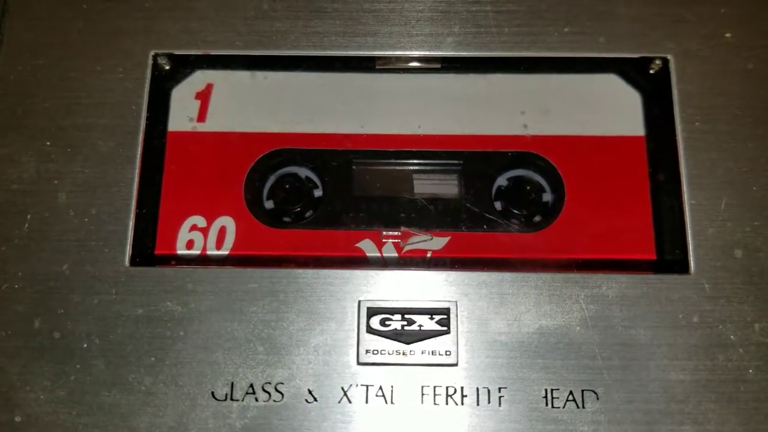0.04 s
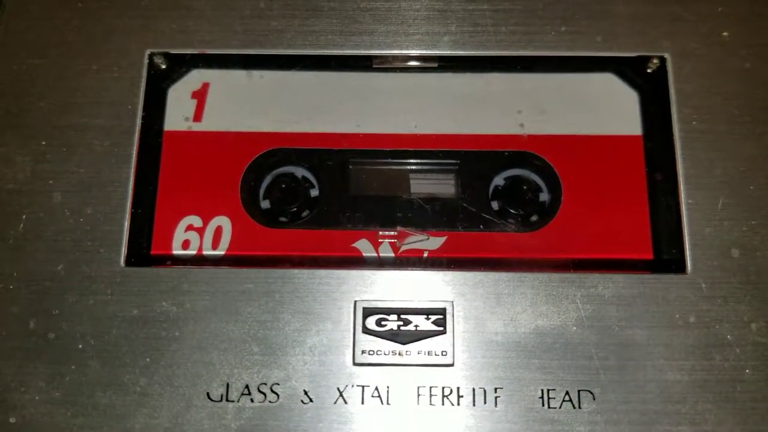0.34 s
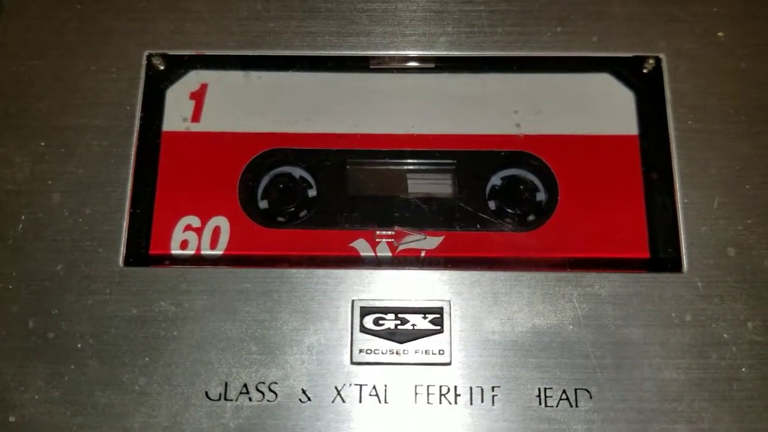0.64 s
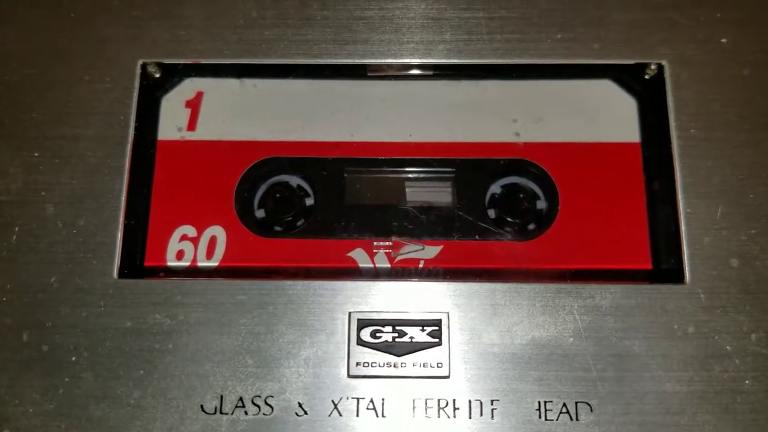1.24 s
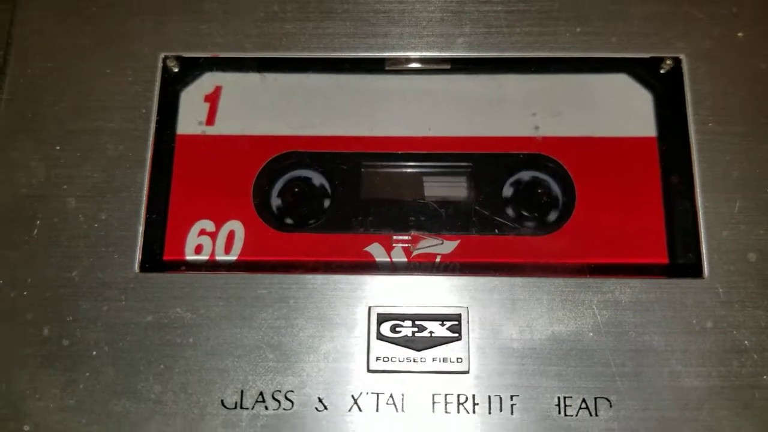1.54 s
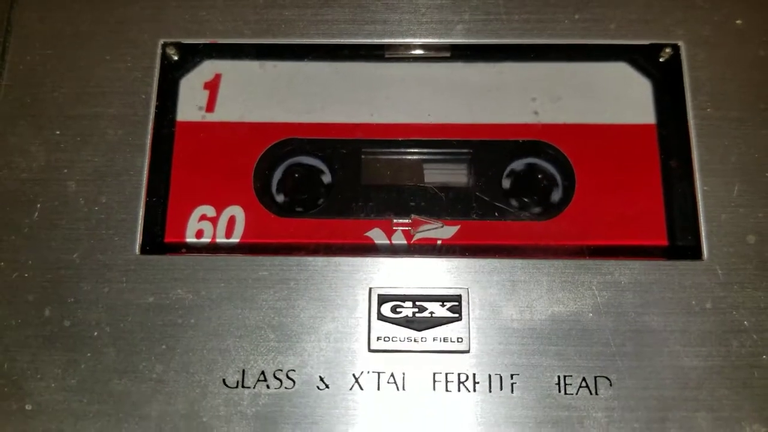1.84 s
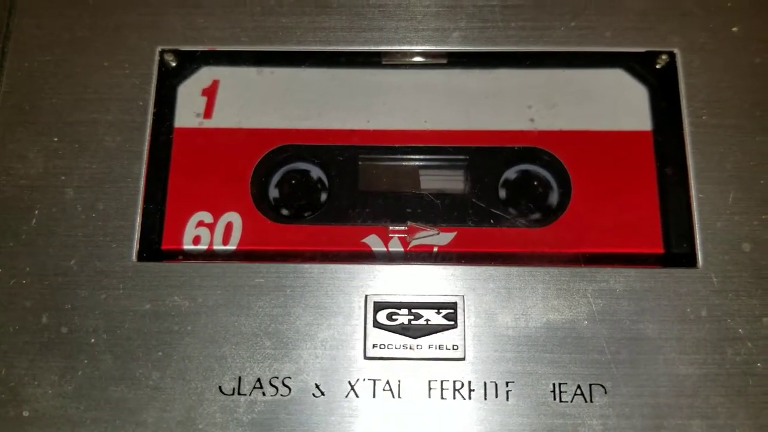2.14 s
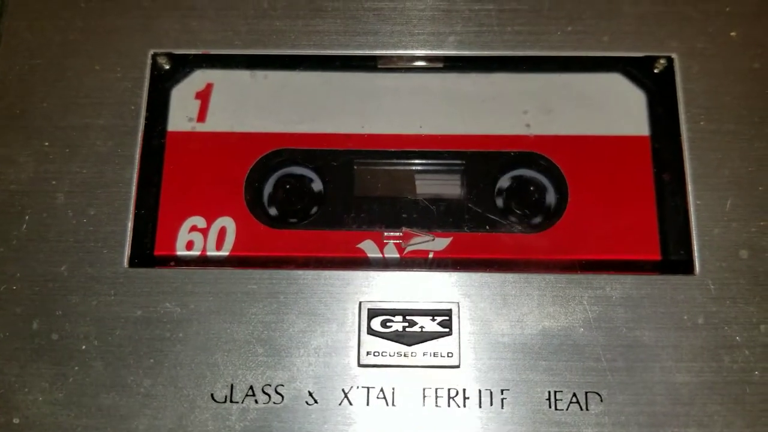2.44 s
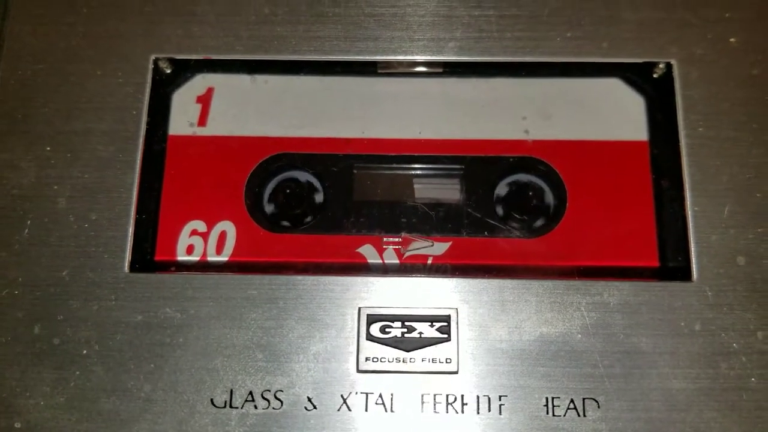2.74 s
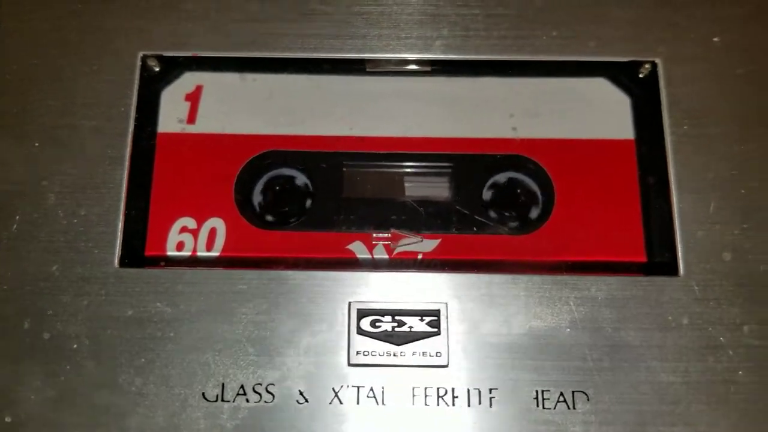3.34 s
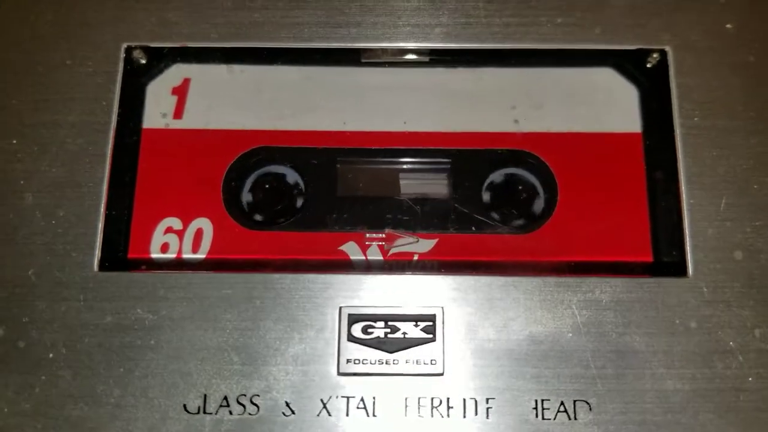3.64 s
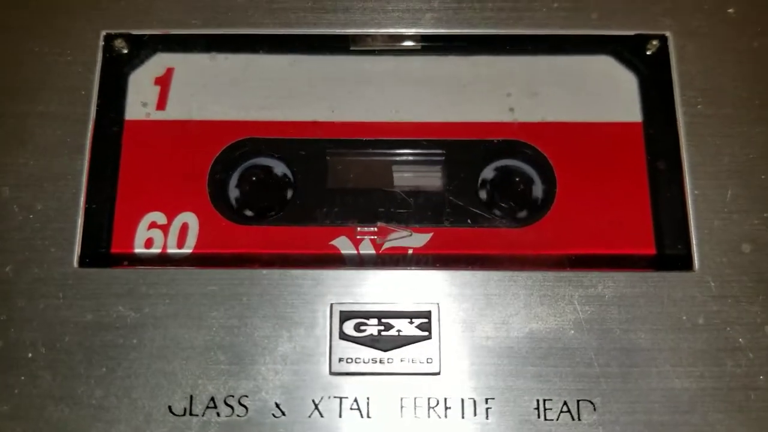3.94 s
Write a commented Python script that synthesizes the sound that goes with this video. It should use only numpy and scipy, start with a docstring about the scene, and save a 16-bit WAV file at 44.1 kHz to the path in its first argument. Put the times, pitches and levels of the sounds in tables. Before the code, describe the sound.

Cassette deck engages with a clunk, then runs with a loud, screeching mechanical buzz.

```python
"""A cassette deck idles with a quiet motor hum. At 1.33 s its transport engages: levers hit their stops
in a double clunk and the chassis rings. From 1.42 s a slipping drive part chatters about 170 times a
second, fluttering with an uneven wheel. Each cycle jolts the chassis into a loud buzz and drags out a
few gritty scrapes that screech in the metal parts. The chatter grows louder. Two microphones, close by."""
import sys
import numpy as np
from scipy import signal
from scipy.fft import rfft, irfft, next_fast_len
from scipy.io import wavfile

SR = 44100
rng = np.random.default_rng(int(sys.argv[2]) if len(sys.argv) > 2 else 0)


def transcribe(u):
    """Save the signal u as a 16-bit wav file named by the first command-line argument.

    u: samples, shape (n,) or (channels, n), limited to [-1, 1]; the rate is SR.
    q: integer samples, one column per channel.
    """
    v = np.clip(np.atleast_2d(u).T, -1, 1)
    q = np.round(v * 32767).astype(np.int16)
    wavfile.write(sys.argv[1], SR, q)


N = 176400
T = np.arange(N) / SR
FFT_SIZE = next_fast_len(N + SR // 2)
BIN_HZ = np.maximum(np.fft.rfftfreq(FFT_SIZE, 1 / SR), 1)

# chatter rate (time [s], rate [Hz])
CHATTER_RATE = [(1.42, 169.9), (2.25, 169.9), (2.42, 171.1), (2.6, 171), (2.8, 171.1), (3.05, 170.1),
                (3.2, 170.4), (3.5, 171.0), (3.68, 170.4), (3.82, 171.1), (4.0, 171)]
# chatter levels (time [s], low partials [dB], upper partials [dB], rasp [dB], sizzle [dB])
CHATTER_LEVELS = [(1.43, -4.5, -2.5, -5.5, -4.5), (1.5, -8.5, -7.5, -2, -4), (1.62, -7.5, -4, -3, -3),
                  (1.78, -3, -2, -4, -3.5), (2.03, -2.5, -2.5, -4, -2.5), (2.38, -3, -4, -3.5, -3.5),
                  (2.6, -1, -1.5, -1, -1), (3.0, 0, 1.5, 0, -1), (3.27, -.5, 0.5, 0, -.5),
                  (3.57, 0.5, -0.5, 1, 0), (4.0, .5, 0, 1, 0.5)]
# rate sway, once and twice per wheel turn (depth [Hz], delay [s])
WHEEL_FLUTTER = [(0.53, .03), (.48, .011)]
# rasp swing from uneven wheel pressure (time [s], depth [dB])
WHEEL_WOBBLE = [(1.7, -0.5), (2.02, 4.5), (2.45, 2.5), (2.75, 2)]
# partials 1, 2, 3 .. of the chatter rate (left [dB], right [dB], left lead [rad])
BUZZ_PARTIALS = [(-41, -34, 0.27), (-55, -58, -1.5), (-31, -33, -1.5), (-59, -41, -3),
                 (-33.5, -35.5, -0.04), (-47.5, -38.5, 1.5), (-43.5, -50, 2.5), (-45.5, -31, 2),
                 (-46, -44.5, 1), (-43, -31, 3), (-45.5, -39.5, -2), (-55, -41.5, 2.5), (-46, -43, 2.1),
                 (-52, -47, -0.5), (-41, -32.5, 2.03), (-44.5, -44.5, 1.7), (-49, -42.5, 2.5),
                 (-54, -40, 3), (-53.5, -46, 1), (-49, -41, 0.5), (-50.5, -44.5, -0.9), (-56, -54, 7.5),
                 (-62, -42.5, -1.5), (-63, -44, -2)]
# scrapes in one cycle (place [cycles], rasp [dB], sizzle [dB])
CYCLE_SCRAPES = [(0.128, -4, -2), (.32, -7, -2.5), (0.411, -0.5, -0.5), (0.581, 3, -11), (.78, 2.5, -9.5),
                 (.95, 1, -5.5)]
# resonances of the metal parts (frequency [Hz], width [Hz], gain [dB])
METAL_MODES = [(420, 22, -2.5), (966, 55, 1), (1570, 25, -4), (2095, 42, -3), (2390, 40, -8.5),
               (2570, 44, -13), (2960, 18, 4), (3080, 60, -6.5), (3440, 39, -2.5), (3586, 31, 3),
               (3940, 45, -3), (4490, 76, -1), (4790, 88, 0), (5510, 200, -5.5), (6600, 230, -1),
               (7380, 360, -4.5), (9900, 300, -11), (11920, 380, -5), (13450, 350, -12), (14950, 300, -4)]
# scrape colour (frequency [Hz], left [dB], right [dB])
SCRAPE_EQ = [(40.3, -62, -55), (75, -50, -50), (130, -35, -36), (255, -36.5, -34), (450, -25, -24.5),
             (580, -23, -29), (750, -35, -24.5), (945, -25, -20.5), (1145, -35.5, -24),
             (1580, -23.5, -15.5), (2120, -33, -19.5), (2470, -17.5, -20), (2880, -26, -21),
             (3590, -23.5, -17.5), (4010, -32.5, -23), (4300, -30, -27), (4770, -34, -24.5),
             (5300, -34.5, -30.5), (5900, -37.5, -24.5), (6950, -35, -28), (7400, -45, -28),
             (8100, -32.5, -29), (11350, -36, -28), (12100, -39, -23.5), (15500, -39.5, -31)]
# lever impacts (time [s], thud [dB], clack [dB], crack [dB])
LEVER_BLOWS = [(1.329, -42, -23, -17), (1.335, -20, -16, -36), (1.3422, -12.5, -2.5, 0.5),
               (1.345, -8, -2, 4.5), (1.3622, -2, -2, 9), (1.3654, 2, 0.5, -6), (1.3755, 1, -10, -18),
               (1.3814, -10.5, -9.5, -22), (1.396, -24, -28, -33)]
# clunk colour (frequency [Hz], left [dB], right [dB])
CLUNK_EQ = [(40, -49, -47), (75, -39, -37), (130, -23, -23), (250, -18, -14.5), (465, -3.5, -2.5),
            (696, -21.5, -19.5), (905, -11, -14), (1380, -23, -6.5), (1730, -21, -6), (2480, -16, -11.5),
            (3700, -28, -12), (4770, -27, -20.5), (9100, -27, -26), (10400, -24, -17.5), (15000, -26, -24)]
# chassis ringing (frequency [Hz], level [dB], T60 [s])
CHASSIS_MODES = [(111, -40.5, .3), (396, -26.5, 0.058), (496.5, -24.5, 0.073), (562, -32, .06),
                 (828, -26, 0.044), (1160, -40, .05), (1420, -34, 0.045), (1670, -32, .04),
                 (1830, -33, .05), (1980, -33, .05)]
# idle hum (frequency [Hz], left [dB], right [dB], waver [dB])
MOTOR_TONES = [(119.9, -59.5, -54.5, 2), (213, -67.5, -70, -1.5), (271.4, -55.5, -57.5, 2),
               (359.5, -67.5, -66, 3), (495.4, -58, -54, 1.8), (670, -78, -82, 5), (730, -67.5, -76, 3.5),
               (2570, -83, -76, 0.5), (2708, -88, -81, 2)]
# colour of motor whirr and hiss (frequency [Hz], left [dB], right [dB])
WHIRR_EQ = [(30, -54, -53), (75, -38.5, -42.5), (160, -50, -41), (226, -28.5, -34), (365, -49, -43),
            (620, -43, -39), (964, -49, -45), (1220, -65, -59), (1880, -59, -46.5), (2320, -60, -52),
            (2560, -61, -48.5), (2960, -71, -51.5), (3920, -72, -54), (5170, -75, -67), (6300, -74, -61),
            (8500, -76, -75), (13000, -72.5, -70)]
# likeness of the two microphones (frequency [Hz], correlation [-1 to 1])
MIC_CORRELATION = [(60, 0.72), (130, 0.96), (330, 1), (700, 0.19), (1400, -0.4), (3100, -0.14),
                   (7000, 0.037)]


def slipping_drive(start_s=1.418, rise_s=0.012, wander_hz=0.12, jitter_hz=1.0):
    """A drive part slips; buzz and scraping share its fluttering chatter rate."""
    flutter_hz = sum(depth_hz * wheel(multiple, delay_s)
                     for multiple, (depth_hz, delay_s) in enumerate(WHEEL_FLUTTER, 1))
    rate_hz = over_time(CHATTER_RATE)[0] + flutter_hz + wander_hz * drift(15) + jitter_hz * drift(150)
    cycles = np.cumsum(rate_hz) / SR
    low_db, upper_db, rasp_db, sizzle_db = over_time(CHATTER_LEVELS)
    onset = np.clip((T - start_s) / rise_s, 0, 1)
    return onset * (buzz(cycles, low_db, upper_db) + scraping(cycles, rasp_db, sizzle_db))


def wheel(multiple, delay_s, turn_hz=12.8, peak_s=2.023):
    """Swing of the uneven wheel at a multiple of its turning rate."""
    return np.cos(2 * np.pi * multiple * turn_hz * (T - peak_s - delay_s))


def buzz(cycles, low_db, upper_db, jolt_at_cycles=0.7, smear_rad=1.44):
    """The chassis answers one jolt per cycle with phase-scattered partials, the higher less steady."""
    partials = np.zeros((2, N))
    for multiple, (left_db, right_db, lead_rad) in enumerate(BUZZ_PARTIALS, 1):
        phase_rad = 2 * np.pi * multiple * (cycles - jolt_at_cycles) + smear_rad * rng.standard_normal()
        force_db = low_db if multiple <= 5 else upper_db
        waver_db = 1.13 * (multiple / 5) ** 0.36 * drift(23)
        gain = from_db(force_db + waver_db) * from_db([[left_db], [right_db]])
        partials += gain * np.sin([phase_rad + lead_rad, phase_rad])
    return np.sqrt(2) * from_db(0.22) * partials


def scraping(cycles, rasp_force_db, sizzle_force_db, scatter_s=0.00018, split_hz=4480):
    """Each cycle drags out gritty scrapes, low rasp plus high sizzle, which ring in the metal."""
    place, rasp_db, sizzle_db = np.transpose(CYCLE_SCRAPES)
    due_cycles = np.arange(int(cycles[-1]) - 1)[:, None] + place
    times_s = np.interp(due_cycles, cycles, T, right=2 * T[-1])
    times_s += scatter_s * rng.standard_normal(times_s.shape)
    excess_db = 3 * rng.uniform(-1, 1, times_s.shape)
    # a strong scrape is weaker one cycle later
    excess_db = excess_db - 0.8 * np.roll(excess_db, 1, axis=0)

    def grit(level_db, decay_s):
        envelope = bursts(times_s.ravel(), (level_db + excess_db).ravel(), decay_s)
        return unit_rms(stereo_noise() * envelope * from_db(-0.5 * drift(3100)))

    rasp = butter(grit(rasp_db, decay_s=0.0011), split_hz, "low")
    sizzle = butter(grit(sizzle_db, decay_s=0.0025), split_hz, "high")
    wobble_db = over_time(WHEEL_WOBBLE)[0] * wheel(0.99, 0)
    rub = from_db(rasp_force_db + wobble_db) * rasp + from_db(sizzle_force_db) * sizzle
    screech = sum(from_db(db) * resonance(rub, hz, width_hz) for hz, width_hz, db in METAL_MODES)
    grip_db = -0.5 + 0.3 * drift(70)
    return from_db(grip_db) * equalise(rub + screech, SCRAPE_EQ)


def transport_clunk(thud_hz=800, crack_hz=4200):
    """Levers hit their stops: a crack, a clack and a longer thud; the chassis rings."""
    times_s, thud_db, clack_db, crack_db = np.transpose(LEVER_BLOWS)

    def band(level_db, edge_hz, kind, t60_s):
        return butter(stereo_noise() * bursts(times_s, level_db, t60_s / np.log(1000)), edge_hz, kind)

    thud = band(thud_db, thud_hz, "low", t60_s=0.052)
    clack = band(clack_db, [thud_hz, crack_hz], "band", t60_s=0.044)
    crack = band(crack_db, crack_hz, "high", t60_s=0.031)
    modes = sum(from_db(db - 60 * T / t60_s) * np.sin(2 * np.pi * hz * T)
                for hz, db, t60_s in CHASSIS_MODES)
    chassis_response = rfft(butter(modes, 110, "high", order=2), FFT_SIZE)
    ring = filtered(impulses(times_s, from_db(thud_db)), chassis_response)
    return from_db(6) * equalise(thud + clack + crack, CLUNK_EQ) + ring


def idling_motor():
    """Mains hum and wavering motor tones over a soft whirr."""
    hum = np.zeros((2, N))
    for hz, left_db, right_db, waver_db in MOTOR_TONES:
        gain = from_db(np.array([[left_db], [right_db]]) + waver_db * drift(23))
        hum += gain * np.sin(2 * np.pi * hz * T + 0.25 * waver_db * drift(5.5))
    whirr = from_db(-1 + drift(6.7)) * equalise(stereo_noise(), WHIRR_EQ)
    return np.sqrt(2) * hum + whirr


def room(x, level_db=-13, t60_s=0.35):
    """Short, dull tail of a small room."""
    tail = butter(rng.standard_normal((2, N)) * from_db(-60 * T / t60_s), 8300, "low", order=1)
    tail /= np.sqrt(np.sum(tail ** 2) / 2)
    return from_db(level_db) * filtered(x, rfft(tail, FFT_SIZE))


def from_db(db):
    """Decibels to gain."""
    return 10 ** (np.asarray(db) / 20)


def unit_rms(x):
    """Scale to rms 1."""
    return x / np.sqrt(np.mean(x ** 2) + 1e-20)


def over_time(rows):
    """Table columns at every sample."""
    times_s, *columns = np.transpose(rows)
    return np.array([np.interp(T, times_s, column) for column in columns])


def over_frequency(rows):
    """Table columns at every FFT bin."""
    hz, *columns = np.transpose(rows)
    return np.array([np.interp(np.log(BIN_HZ), np.log(hz), column) for column in columns])


def drift(corner_hz):
    """Low-passed noise, rms 1."""
    spectrum = rfft(rng.standard_normal(FFT_SIZE)) / (1 + (BIN_HZ / corner_hz) ** 2)
    return unit_rms(irfft(spectrum, FFT_SIZE)[:N])


def filtered(x, response):
    """Apply a frequency response."""
    return irfft(rfft(x, FFT_SIZE) * response, FFT_SIZE)[..., :N]


def equalise(x, rows):
    """Minimum-phase filter from a left and right spectrum."""
    cepstrum = irfft(np.log(from_db(over_frequency(rows))), FFT_SIZE)
    causal_fold = 1 + np.sign(np.fft.fftfreq(FFT_SIZE))
    return filtered(x, np.exp(rfft(cepstrum * causal_fold)))


def butter(x, hz, kind, order=4):
    """Butterworth filter."""
    return signal.sosfilt(signal.butter(order, hz, kind, fs=SR, output="sos"), x + 1e-18)


def resonance(x, hz, width_hz):
    """Two-pole band-pass, peak gain 1."""
    radius = np.exp(-np.pi * width_hz / SR)
    feedback = [1, -2 * radius * np.cos(2 * np.pi * hz / SR), radius ** 2]
    return signal.lfilter(np.array([1, 0, -1]) * (1 - radius ** 2) / 2, feedback, x)


def stereo_noise():
    """White noise at two microphones, alike in the bass."""
    alike = np.clip(over_frequency(MIC_CORRELATION)[0], -0.99, 0.99)
    mid, side = filtered(rng.standard_normal((2, N)), np.sqrt([(1 + alike) / 2, (1 - alike) / 2]))
    return np.array([mid + side, mid - side])


def impulses(times_s, heights):
    """Single-sample pulses."""
    return np.bincount(np.maximum(times_s * SR, 0).astype(int), heights, N)[:N] + 1e-18


def bursts(times_s, level_db, decay_s):
    """Envelope of sudden, decaying bursts, summed in power."""
    power = impulses(times_s, from_db(level_db) ** 2)
    return np.sqrt(signal.lfilter([1], [1, -np.exp(-2 / (decay_s * SR))], power))


def scene():
    """The motor idles, the transport engages, the drive slips."""
    clunk = transport_clunk()
    return idling_motor() + clunk + room(clunk) + slipping_drive()


def record(dry, ceiling=0.75, cutoff_hz=15720):
    """Soft clip, then steep low-pass."""
    rounded = ceiling * np.tanh(dry / ceiling)
    return signal.sosfilt(signal.ellip(12, 0.1, 90, cutoff_hz, fs=SR, output="sos"), rounded)


dry = scene()
out = record(dry)
transcribe(out)
```